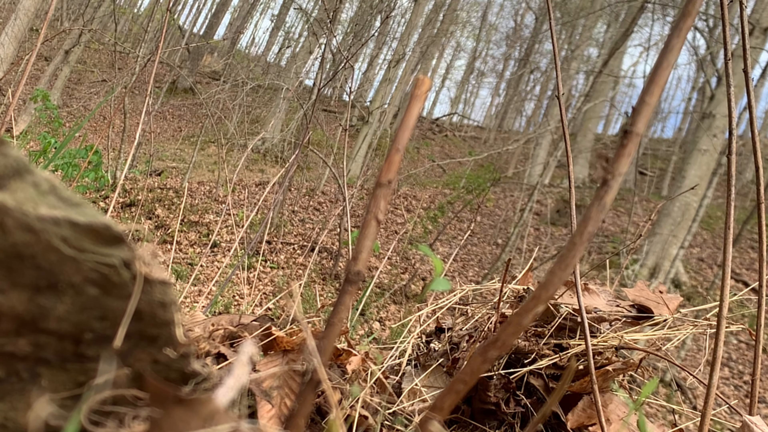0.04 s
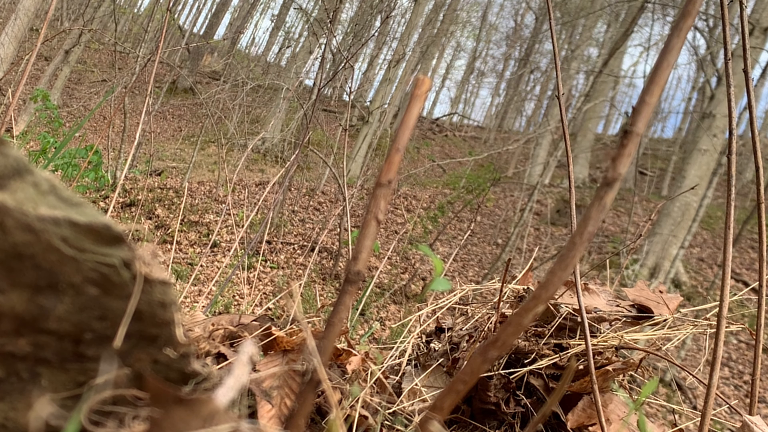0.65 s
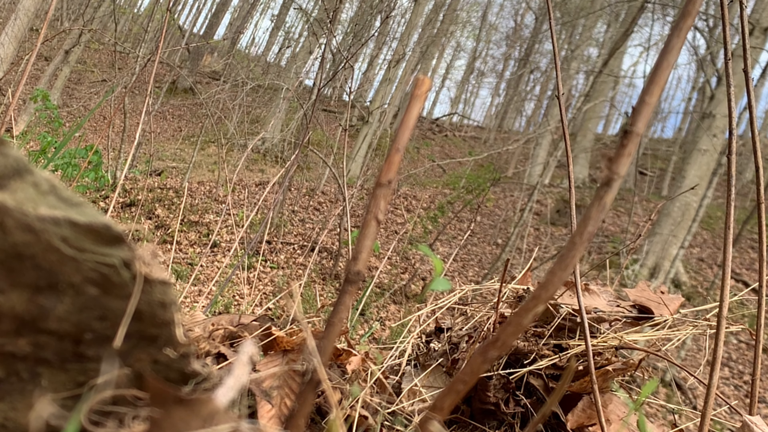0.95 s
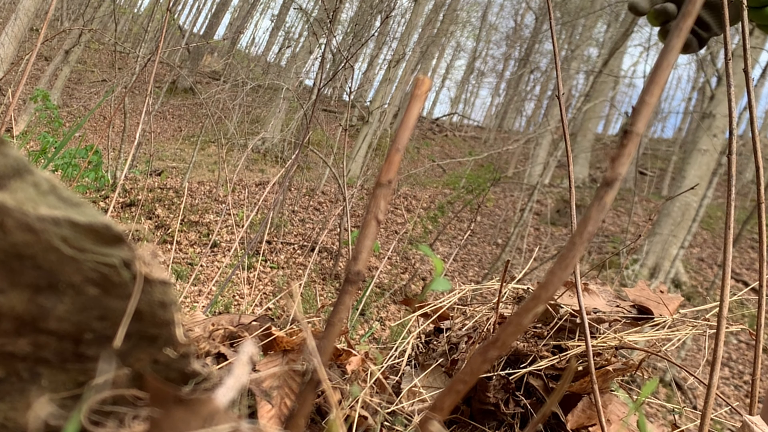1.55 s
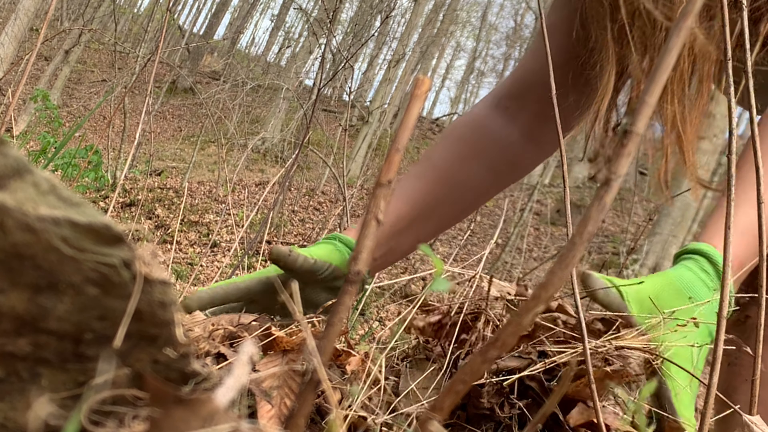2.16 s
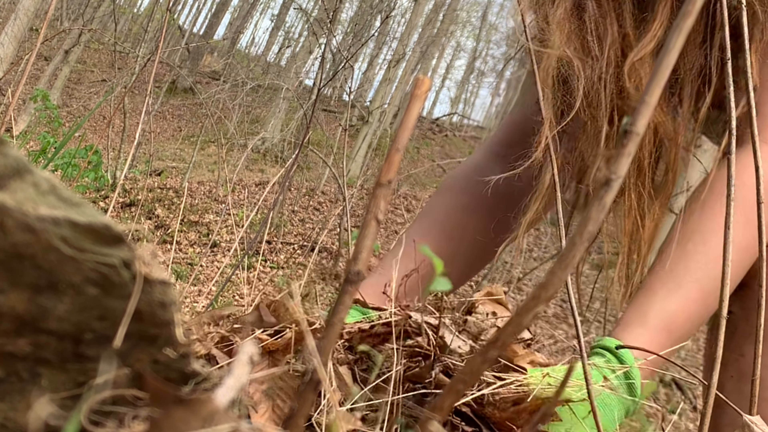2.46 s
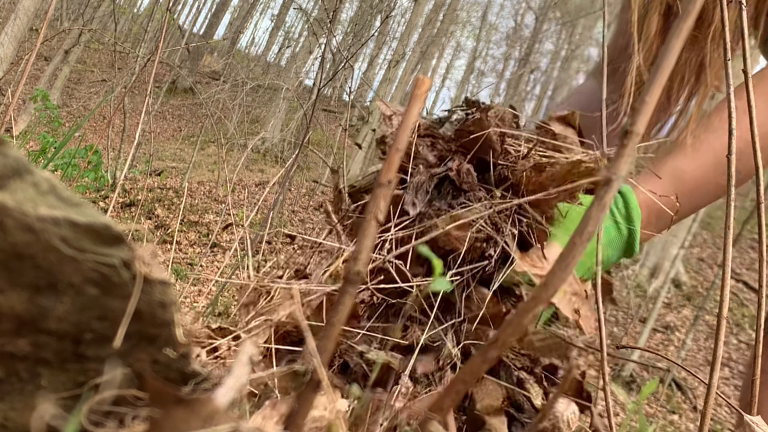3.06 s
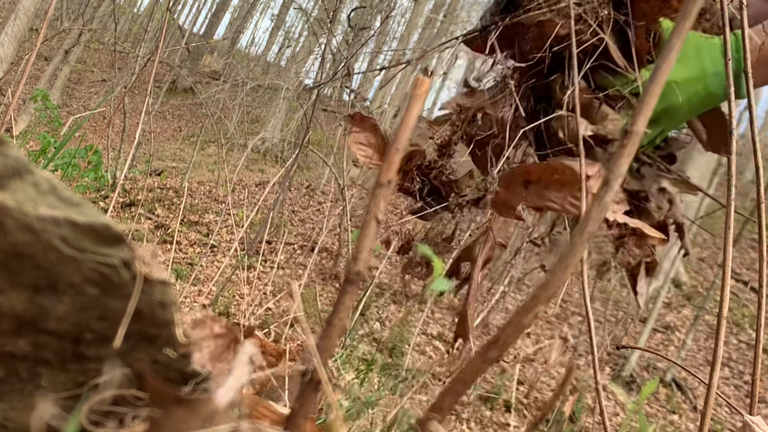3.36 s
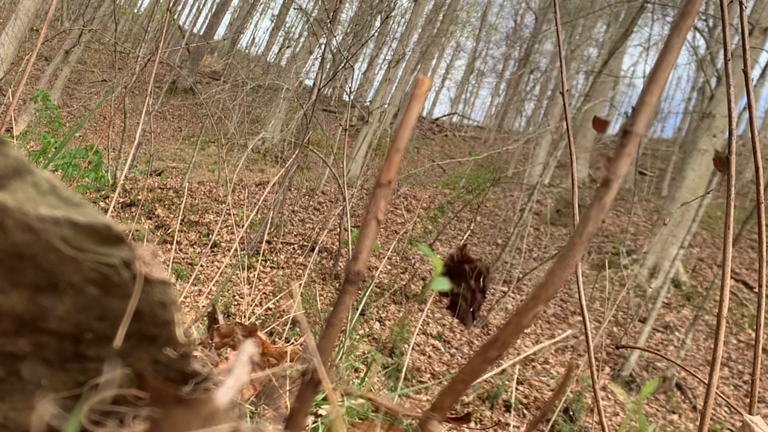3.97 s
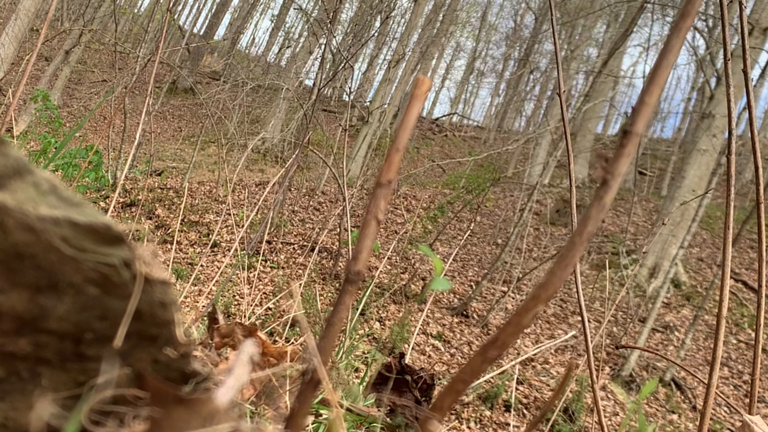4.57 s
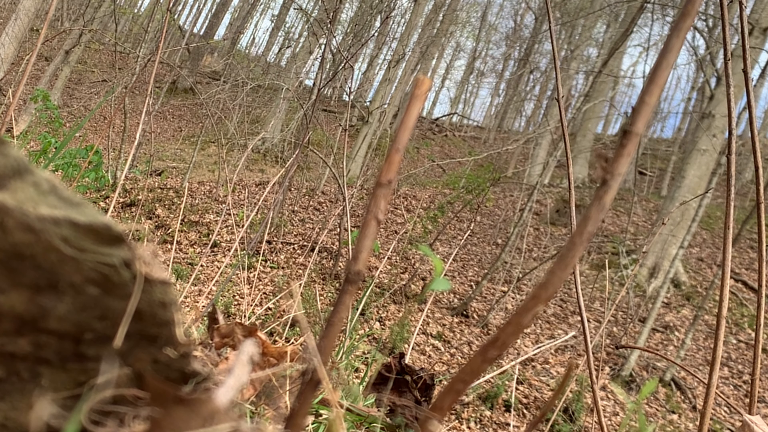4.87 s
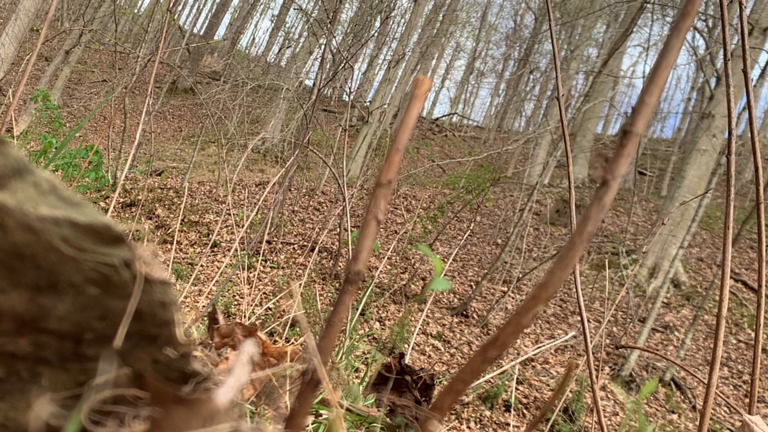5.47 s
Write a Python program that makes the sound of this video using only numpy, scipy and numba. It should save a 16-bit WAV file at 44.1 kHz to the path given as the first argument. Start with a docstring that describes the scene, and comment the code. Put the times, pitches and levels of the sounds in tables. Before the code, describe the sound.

Dry leaves rustle on a quiet forest floor, heard from a microphone on the ground over very faint, steady woodland air. For the first second there is only light crinkling and a few small twig ticks. From about 0.8 to 2.3 seconds footsteps wade closer in uneven swells, with crunching leaves, snapping twigs and soft thuds. At about 2.4 seconds hands push into the pile with a dull bump and sharp cracks. A loud, close, hissing crackle follows as an armful is gathered and lifted, strongest from about 2.7 to 3.5 seconds and dotted with bright twig snaps. The rustle then eases, and a clod and loose debris land around 4 seconds with dull thuds and a snap. Softer crunching steps move away with scattered cracks and another low thud near 5 seconds, and one more rustle swells at about 5.5 seconds.

```python
"""Dry leaves on a forest floor: someone wades up to a camera on the ground, scoops an armful, carries it off.
The litter is thousands of tiny fractures and rubs, each a short ringing grain, swelling with every shove.
Single leaves buckle, twigs snap, stalks ping and the damp mat rubs hollowly under hands and feet.
Footfalls and a falling clod add dull thuds, and faint woodland air lies under it all."""
import sys
import numpy as np
from scipy.fft import rfft, irfft, next_fast_len
from scipy.io import wavfile
from scipy.ndimage import map_coordinates
from numba import njit

SR = 44100
rng = np.random.default_rng(int(sys.argv[2]) if len(sys.argv) > 2 else 0)


def transcribe(u):
    """Save the signal u as a 16-bit wav file named by the first command-line argument.

    u: samples, shape (n,) or (channels, n), limited to [-1, 1]; the rate is SR.
    q: integer samples, one column per channel.
    """
    v = np.clip(np.atleast_2d(u).T, -1, 1)
    q = np.round(v * 32767).astype(np.int16)
    wavfile.write(sys.argv[1], SR, q)


N = 247748

# Shoves of a foot, a hand or falling debris; mat, crunch and crackle are relative to the level:
# start_s, rise_s, hold_s, level_db, mat_db, crunch_db, crackle_db
SHOVES = [(.04, .13, 0.012, -57.5, 5, 0, -4), (.33, 0.04, .055, -57, -8, -4, -2.5),
          (.39, 0.092, .41, -50, 1, -6.5, -1.5), (.83, .15, 0.015, -39.5, -8, -7.5, -9.5),
          (.99, .11, .14, -41.5, -7, -4, -3.5), (1.18, .13, .27, -32.5, -21, -8.5, -11),
          (1.325, 0.024, 0.15, -38, -12, 2, -5.5), (1.59, 0.058, 0.17, -48, -14, -6.5, -4),
          (1.78, 0.13, .081, -53, -15, -5.5, -2.5), (1.94, 0.046, 0.14, -34.5, -20.5, -9, -8.5),
          (2.11, 0.049, 0.29, -32, -31, -21, -15), (2.35, 0.019, 0.019, -34.5, -19, -1.5, -10),
          (2.405, .013, 0.1, -23.5, -25.5, -9.5, -11), (2.65, 0.031, 0.038, -23, -10.5, -4.5, -8),
          (3.31, 0.031, .2, -28, -24, -16.5, -10), (3.48, 0.14, 0.21, -33, -16.5, -11, -10.5),
          (3.74, 0.028, 0.11, -38, -16, -4, -20), (3.84, 0.071, 0.26, -37, -13.5, -8.5, -9),
          (4.05, 0.048, 0.013, -38.5, -4.5, 0, -2.5), (4.19, 0.03, 0.15, -46, -15, -13, -12),
          (4.39, 0.015, 0.037, -43, -17.5, -13, -7.5), (4.452, 0.022, 0.1, -37.5, -15.5, -14, -5.5),
          (4.54, 0.14, 0.11, -41, -10.5, -13.5, -7), (4.8, 0.022, .09, -44.5, -11.5, -10, -5.5),
          (4.915, 0.018, 0.3, -40.5, -8.5, -8, -5.5), (5.21, .2, .25, -43, -2, 0, -2),
          (5.49, .13, .055, -31.5, -12, -10, -5.5)]
# Both arms press the pile together, then lift its weight off the ground:
# time_s, level_db, mat_db, crunch_db, crackle_db
ARMFUL = [(2.39, -29.5, -8, -11.5, -5), (2.438, -33.5, 1.5, -9, -10), (2.526, -23.5, -12, -5, -6.5),
          (2.768, -19.5, -16.5, -10.5, -9), (2.956, -22.5, -14, -8.5, -5.5),
          (3.204, -20.5, -24, -16, -12.5), (3.272, -25.5, -22.5, -18.5, -8.5),
          (3.36, -21.5, -28, -18, -10.5)]
# Weight reaching the soil, as rumble relative to the mat: time_s, rumble_db
SOIL_WEIGHT = [(0, -4), (1.5, -7), (2.1, -39), (2.45, -15.5), (3.2, -7), (4.1, -11.5), (4.75, -20),
               (5.1, -12)]
# Tone colours of the litter layers, low to high: frequency_hz, level_db
SOIL_COLOUR = [(25, -71), (55, -4), (125, -6), (170, -5), (260, -6), (400, -21)]
MAT_COLOUR = [(90, -13), (190, -7), (290, 0.5), (385, 0), (520, -5), (1200, -20.5)]
CRUNCH_COLOUR = [(200, -29), (400, -6.5), (550, 2), (830, 3.5), (1120, 1), (1380, 0), (1750, -4),
                 (2400, -10.5), (3100, -23), (4500, -12.5)]
CRACKLE_COLOUR = [(1500, -4), (2400, -3), (2850, -3), (3250, -8.5), (4100, 0.5), (5300, -2), (7000, 1),
                  (8000, -3.5), (9500, -107)]
SIZZLE_COLOUR = [(6000, -17), (7700, -13.5), (8200, -10), (10000, 2.5), (12200, 0), (14000, 1.5),
                 (15600, 2.5), (17000, 12.5)]
# Single leaves buckling under a foot or a hand: start_s, level_db, pitch_hz
LEAF_BUCKLES = [(1.358, -21, 1310), (1.443, -18, 1400), (1.4535, -16.5, 870), (1.502, -13.5, 780),
                (1.554, -15.5, 1210), (1.6792, -19.5, 1110), (1.7251, -15.5, 996), (2.007, -17.5, 1530),
                (2.0503, -19.5, 1250), (2.090, -19.5, 1510), (2.1527, -16.5, 1120), (2.4222, -12, 830),
                (4.050, -22, 805), (4.968, -33, 680)]
# Twigs breaking, the knock relative to the level: start_s, level_db, knock_db, brightness_db_per_octave
TWIG_SNAPS = [(0.3935, -34.5, -14, 0), (0.5763, -33.5, 2.5, -6), (0.749, -26, -24, 3.5),
              (1.2863, -14.5, -29, 6), (1.679, -19, -10, 3.5), (1.6815, -14, -8.5, 10),
              (1.7272, -17, -17, 5.5), (2.0912, -15, -16, 15), (2.1215, -17, -19, 15),
              (2.1548, -12, -12, 12), (2.4207, -7, -22, 24), (2.4453, -4, -10, 25), (2.5095, -12, -23, 15),
              (2.6515, -9, -22, 20), (2.7015, -13, -16, 20), (2.8405, -6, -22, 20), (2.9327, -7, -31, 7),
              (3.052, -4.5, -26, 8), (3.197, -15, -24, 26), (3.3282, -17, -26, 19), (3.4210, -6, -28, 29),
              (3.4510, -3, -31, 30), (3.714, -15, -27, 24), (4.1033, -8.5, -19, 1.5),
              (4.3945, -23, -22, 14), (4.4062, -19.5, -17, 4), (4.4616, -21, -26, 5),
              (4.5415, -14.5, -12, 7), (4.048, -16, -13, 15), (4.761, -20, -22, 11), (4.9305, -29, -14, 17),
              (5.0689, -18.5, -30, 1.5)]
# Tone colours of a woody knock and a splintering crack: frequency_hz, level_db
KNOCK_COLOUR = [(30, -55), (100, -12), (400, 0), (950, 8), (1600, -9), (2800, -24), (6000, -71)]
CRACK_COLOUR = [(500, 1.8), (2200, 7.9), (3200, 3.8), (4200, 1.9), (7000, 0.79), (10000, 3.7)]
# Thin dry stalks springing free: start_s, peak_db, pitch_hz
STALK_PINGS = [(2.1536, -24, 6670), (2.9375, -15, 6700)]
# The damp mat rubbing under hands and receding steps: start_s, length_s, level_db, pitch_hz
MAT_RUBS = [(2.424, 0.038, -30, 303), (2.441, 0.06, -36.5, 334), (5.043, 0.22, -48, 378),
            (5.564, 0.092, -45, 325)]
# Soft blows on the ground and on buried sticks: start_s, level_db, pitch_hz
GROUND_THUDS = [(0.775, -37.5, 75), (1.49, -23.5, 223), (2.155, -25.5, 380), (2.422, -16, 340),
                (2.428, -12.5, 264), (2.444, -19, 294), (3.941, -15.5, 784), (4.026, -21.5, 200),
                (4.031, -25, 90), (4.732, -36.5, 82), (4.968, -16.5, 400), (5.021, -25, 346)]
# Tone colour of the woodland air: frequency_hz, level_db
AIR_COLOUR = [(15, -36), (25, -6), (93, -9.5), (1850, -29.5), (2850, -41), (3530, -36), (7910, -40),
              (8580, -45), (9300, -29), (15500, -46)]
# Where the litter moves, as a delay between the two microphone ports: time_s, left_lag_ms
STEREO_PATH = [(0, 0.26), (1.2, 0.14), (1.9, 0.035), (2.4, -0.044), (3.1, 0.011), (3.6, 0.038), (4.1, 0.19),
               (4.6, 0.14), (5.6, 0.35)]
# Leaves lie all around, so their phases differ between the ports: frequency_hz, scatter_rad
PHASE_SCATTER = [(50, .55), (120, .4), (280, .08), (550, .46), (1500, .3), (2600, .5), (3500, 1.1),
                 (5600, 1.4), (6800, .9), (8300, .2), (10000, .65), (12300, .6), (13450, .3), (15000, .65)]
# In the treble the camera body sets the phase between the ports: frequency_hz, left_lead_rad
BODY_PHASE = [(0, 0), (6200, 0), (7300, -1.4), (8400, -3.14), (11000, -6.28), (13450, -9.42),
              (15700, -12.57), (17000, -14)]


def leaf_litter(mat_db, crunch_db, crackle_db, sizzle_db):
    """Soil rumbles, the damp mat rubs, whole leaves crunch, stalks crackle and brittle edges sizzle."""
    rumble_db, = curves(SOIL_WEIGHT)
    # a few stirred leaves crinkle one by one; a whole armful blends into an even rush
    sparse = np.interp(sizzle_db, [-45, -24], [1.05, 0.56])
    soil = grains(SOIL_COLOUR, sparse, t60_s=0.29, spread_db=1, clump_db=4, per_s=900)
    mat = grains(MAT_COLOUR, sparse, t60_s=0.053, spread_db=2, clump_db=1.4, per_s=2500)
    crunch = grains(CRUNCH_COLOUR, sparse, t60_s=0.0069, spread_db=1, clump_db=1.5, per_s=5000)
    crackle = grains(CRACKLE_COLOUR, sparse, t60_s=0.0074, spread_db=2.5, clump_db=1.5, per_s=8000)
    edges = grains(SIZZLE_COLOUR, sparse, t60_s=0.004, spread_db=3, clump_db=1.5, per_s=14000)
    # single leaf ribs crack and stand a little out of the sizzle
    ribs = grains(SIZZLE_COLOUR, sparse, t60_s=0.004, spread_db=3, clump_db=1, per_s=400)
    lows = amp(mat_db + rumble_db) * soil + amp(mat_db - 0.3) * mat
    mids = amp(crunch_db - 0.31) * crunch + amp(crackle_db) * crackle
    highs = amp(sizzle_db + 4) * (edges + ribs / 2)
    return lows + mids + highs


def shove_levels(scoop_rise_s=0.071, settle_t60_s=0.27):
    """Each push builds, holds and settles; summed, they give mat, crunch, crackle and sizzle in dB."""
    t = np.arange(N) / SR
    grab_s, end_s = ARMFUL[0][0], ARMFUL[-1][0]
    scoop = (grab_s - scoop_rise_s, scoop_rise_s, end_s - grab_s, *curves(ARMFUL))
    power = np.full((4, N), 1e-12)
    for start_s, rise_s, hold_s, level_db, mat_db, crunch_db, crackle_db in [*SHOVES, scoop]:
        age = t - start_s
        attack = np.clip(age / rise_s, 0, 1)
        release = amp(-60 * np.maximum(age - rise_s - hold_s, 0) / settle_t60_s)
        for layer, share_db in enumerate([mat_db, crunch_db, crackle_db, 0]):
            power[layer] += (amp(level_db + share_db) * attack * release) ** 2
    return 10 * np.log10(power)


def grains(colour, sparse, t60_s, spread_db, clump_db, per_s):
    """Stereo litter texture of rms 1: tiny fractures, each ringing briefly at its own pitch."""
    total = int(per_s * N / SR)
    when, pitch, turn = rng.random((total, 3)).T
    size, place, life = np.clip(rng.standard_normal((total, 3)), -2.6, 2.6).T
    starts = (when * N).astype(np.int64)
    hz = colour[0][0] + pitch * (colour[-1][0] - colour[0][0])
    ring_samples = t60_s * SR * np.exp(life / 2)
    poles = np.exp(2j * np.pi * hz / SR - np.log(1000) / ring_samples)
    # one leaf gives way in a short run of fractures, and whole bunches give way together
    clumps = clump_db * (0.13 * wobble(per_s=330) + 0.92 * wobble(per_s=60) + 0.37 * wobble(per_s=16))
    strength = amp(sparse[starts] * clumps[starts] + spread_db * size) / np.sqrt(ring_samples)
    left_lead = port_phase(starts / SR, hz) + along(PHASE_SCATTER, hz) * place
    phases = 2 * np.pi * turn + np.array([left_lead, -left_lead]) / 2
    texture = ring(starts, poles, strength * np.exp(1j * phases), ring_samples.astype(np.int64), N)
    return unit(coloured(texture, colour))


def leaf_buckles(folds=4, gap_s=0.002275, loss_db=7, detune_spread=0.25, ring_cycles=8.2, rise_s=0.00053):
    """A whole leaf buckles with one dull pop, and a run of weaker folds follows at nearby pitches."""
    out, t = np.zeros((2, N)), np.arange(SR // 40) / SR
    fold = np.arange(folds)[:, None]
    for start_s, level_db, hz in LEAF_BUCKLES:
        jitter, detune, size = rng.standard_normal((folds, 3)).T[..., None] * (fold > 0)
        age = np.maximum(t - gap_s * (fold + jitter / 3), 0)
        fold_hz = hz * np.exp(detune_spread * detune)
        attack = 1 - np.exp(-age / rise_s)
        decay = amp(2 * size - loss_db * fold - 60 * age * fold_hz / ring_cycles)
        pops = np.sin(2 * np.pi * fold_hz * age) * attack * decay
        add(out, start_s, amp(level_db - 0.5) * pressure(pops.sum(0), hz))
    return out


def twig_snaps():
    """A twig bends with a woody knock, breaks with a very short crack, and shakes the leaves around it."""
    out = np.zeros((2, N))
    for start_s, level_db, knock_db, brightness in TWIG_SNAPS:
        colour = [(hz, db + brightness * np.log2(hz)) for hz, db in CRACK_COLOUR]
        knock = burst(start_s, KNOCK_COLOUR, t60_s=0.036)
        crack = burst(start_s, colour, t60_s=0.011)
        shake = burst(start_s, colour, t60_s=0.045)
        add(out, start_s - 0.0012, amp(level_db + knock_db - 8) * knock)
        add(out, start_s, amp(level_db + 2) * crack + amp(level_db - 14) * shake)
    return out


def stalk_pings(t60_s=0.013, rise_s=0.00073, split=0.035):
    """A stalk springs free and rings for a moment in two bending modes, just above and below its pitch."""
    out, t = np.zeros((2, N)), np.arange(SR // 20) / SR
    envelope = amp(-60 * t / t60_s) * (1 - np.exp(-t / rise_s))
    for start_s, peak_db, hz in STALK_PINGS:
        modes = sum(np.sin(2 * np.pi * (hz * (1 + side * split) * t + rng.random())) for side in (-1, 1))
        ping = modes * envelope
        add(out, start_s, amp(peak_db) * ping / np.abs(ping).max())
    return out


def mat_rubs(width_hz=90):
    """A pad of damp leaves sticks and slips under pressure and rings in one narrow, hollow resonance."""
    out, t = np.zeros(N), np.arange(N) / SR
    for start_s, length_s, level_db, hz in MAT_RUBS:
        band = lambda f: 1j * f * width_hz / (hz ** 2 - f ** 2 + 1j * f * width_hz)
        hollow = unit(filtered(rng.standard_normal(N), lambda f: band(f) ** 2))
        progress = np.clip((t - start_s) / length_s, 0, 1)
        swell = np.sqrt(np.abs(np.sin(np.pi * progress)))
        out += amp(level_db) * hollow * swell
    return out


def ground_thuds(t60_at_100_hz_s=0.063, rise_s=0.00051):
    """Cushioned blows: a few cycles of one low pitch, roughened by the leaves in between."""
    out, t = np.zeros((2, N)), np.arange(SR // 5) / SR
    for start_s, level_db, hz in GROUND_THUDS:
        t60_s = t60_at_100_hz_s * (100 / hz) ** 0.9  # higher blows die sooner
        motion = np.sin(2 * np.pi * hz * t) * amp(-60 * t / t60_s) * (1 - np.exp(-t / rise_s))
        add(out, start_s, amp(level_db - 3.5) * pressure(motion, hz))
        add(out, start_s, amp(level_db - 40) * burst(start_s, KNOCK_COLOUR, t60_s=0.018))
    return out


def woodland_air(level_db=-64):
    """A faint, steady bed of hush, half centred and half wide."""
    hush = rng.standard_normal(N) + rng.standard_normal((2, N))
    return amp(level_db) * unit(coloured(hush, AIR_COLOUR))


def burst(time_s, colour, t60_s):
    """A dying puff of noise with peak 1, placed in stereo where the litter is moving."""
    t = np.arange(SR // 10) / SR
    noise = coloured(rng.standard_normal(len(t)), colour)
    puff = np.pad(noise * amp(-60 * t / t60_s), (16, 0))  # room for one side to arrive early
    pair = filtered(puff, lambda hz: phase_pair(port_phase(time_s, hz)))
    return pair / np.abs(pair).max()


def port_phase(time_s, hz):
    """Left lead in radians from the path difference; zero in the treble, where the body takes over."""
    lag_s = np.interp(time_s, *np.transpose(STEREO_PATH)) / 1000
    return -2 * np.pi * hz * lag_s * (hz < BODY_PHASE[1][0])


def phase_pair(left_lead):
    """Left and right responses that share a phase difference equally."""
    return np.exp(0.5j * left_lead * np.array([[1], [-1]]))


def pressure(motion, hz):
    """Sound pressure follows the change of motion; the gain is about 1 at hz."""
    return np.gradient(motion) * SR / (2 * np.pi * hz)


@njit
def ring(starts, poles, strengths, lengths, n):
    """Sum of damped sines, one for each grain, in two channels."""
    out = np.zeros((2, n))
    for grain in range(len(starts)):
        phasor = 1 + 0j
        for i in range(starts[grain], min(n, starts[grain] + lengths[grain])):
            out[0, i] += (phasor * strengths[0, grain]).imag
            out[1, i] += (phasor * strengths[1, grain]).imag
            phasor *= poles[grain]
    return out


def amp(db):
    """Decibels to gain."""
    return 10 ** (np.asarray(db) / 20)


def unit(x):
    """Scale to rms 1."""
    return x / np.sqrt(np.mean(x ** 2) + 1e-20)


def along(points, hz):
    """Read (frequency_hz, value) points on a log axis."""
    knots_hz, values = np.transpose(points)
    return np.interp(np.log(hz + 1), np.log(knots_hz + 1), values)


def curves(rows):
    """An automation curve for each column after the time."""
    times_s, *columns = np.transpose(rows)
    return [np.interp(np.arange(N) / SR, times_s, column) for column in columns]


def wobble(per_s):
    """A smooth random curve with per_s knots a second."""
    knots = rng.standard_normal(int(N * per_s / SR) + 4)
    return map_coordinates(knots, [np.arange(N) * per_s / SR], order=2)


def filtered(x, response):
    """Filter x by a function of frequency."""
    n = x.shape[-1]
    padded = next_fast_len(n + 4096)
    return irfft(rfft(x, padded) * response(np.fft.rfftfreq(padded, 1 / SR)), padded)[..., :n]


def coloured(x, colour):
    """EQ x with (frequency_hz, level_db) points."""
    return filtered(x, lambda hz: amp(along(colour, hz)))


def add(out, start_s, sound):
    """Mix a sound in at start_s."""
    part = out[:, round(start_s * SR):][:, :sound.shape[-1]]
    part += sound[..., :part.shape[-1]]


def scene():
    """The stereo mix: rustling leaves, low blows and air, with sharp snaps and pings on top."""
    leaves = leaf_litter(*shove_levels()) + leaf_buckles() + mat_rubs()
    return leaves + ground_thuds() + woodland_air() + twig_snaps() + stalk_pings()


def record(dry):
    """The camera cuts the deep bass and the very top, and its body turns the phase between the ports."""
    bottom_hz, top_hz = 44, 15850
    low_cut = lambda hz: (1j * hz / (bottom_hz + 1j * hz)) ** 2
    body_turn = lambda hz: phase_pair(np.interp(hz, *np.transpose(BODY_PHASE)))
    return filtered(dry, lambda hz: low_cut(hz) * body_turn(hz) * (hz < top_hz))


dry = scene()
out = record(dry)
transcribe(out)
```